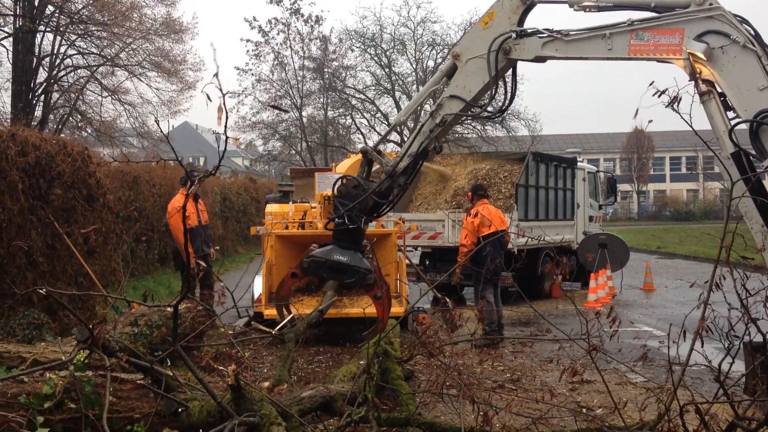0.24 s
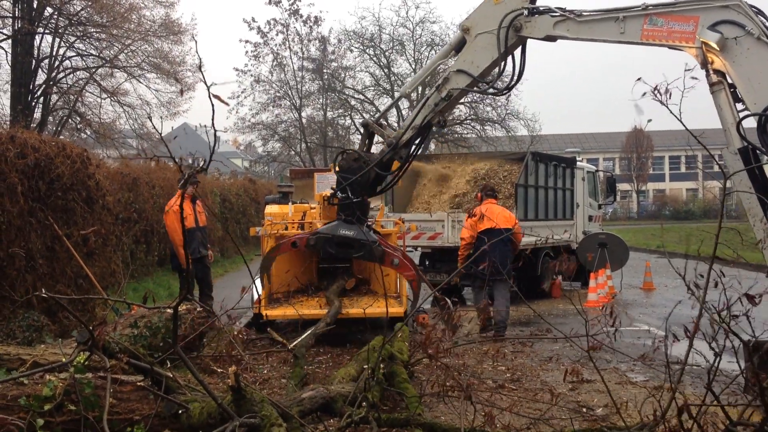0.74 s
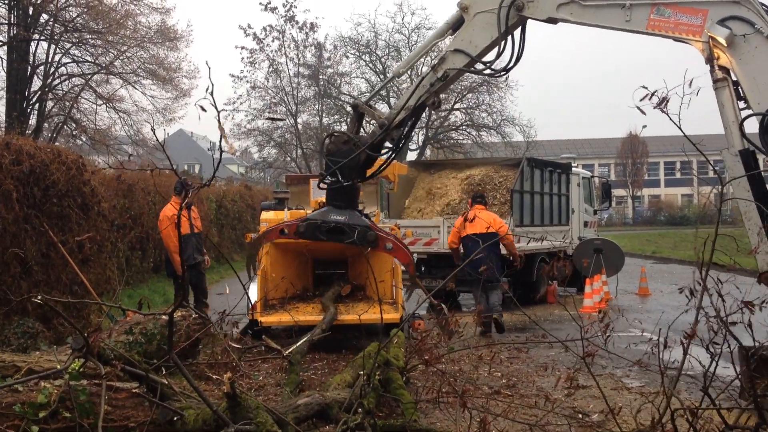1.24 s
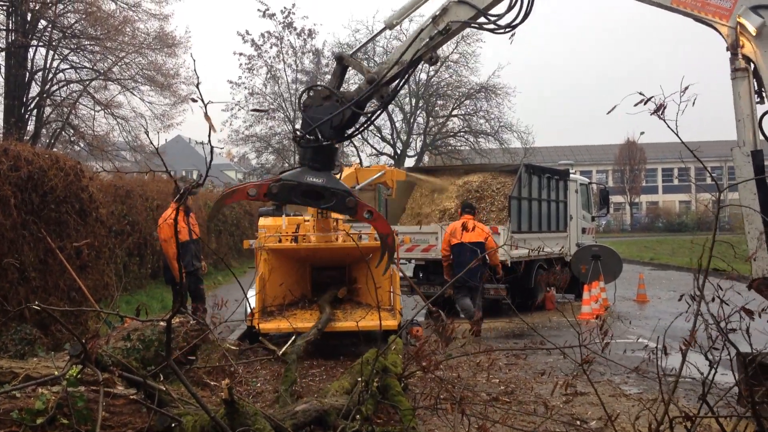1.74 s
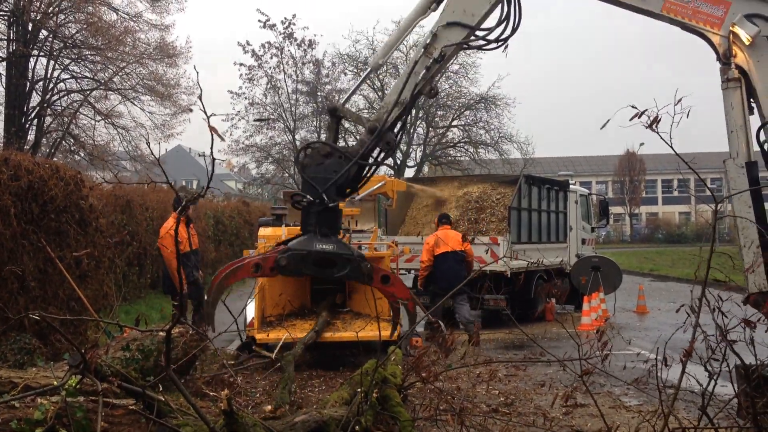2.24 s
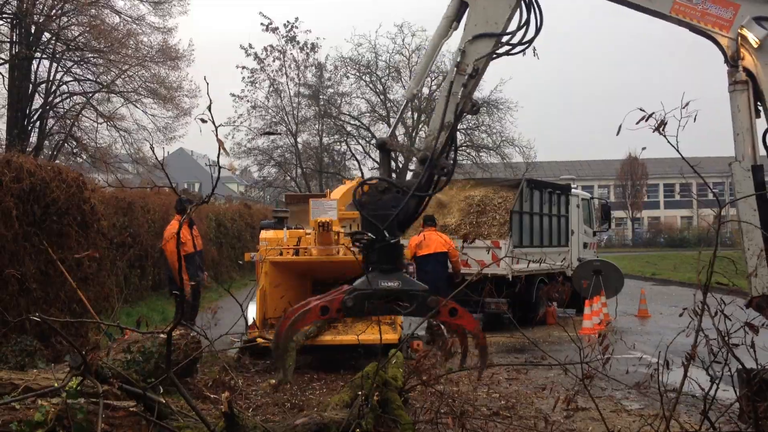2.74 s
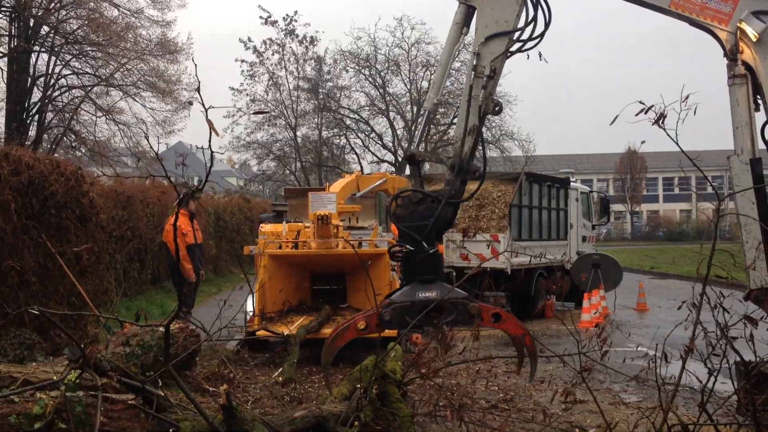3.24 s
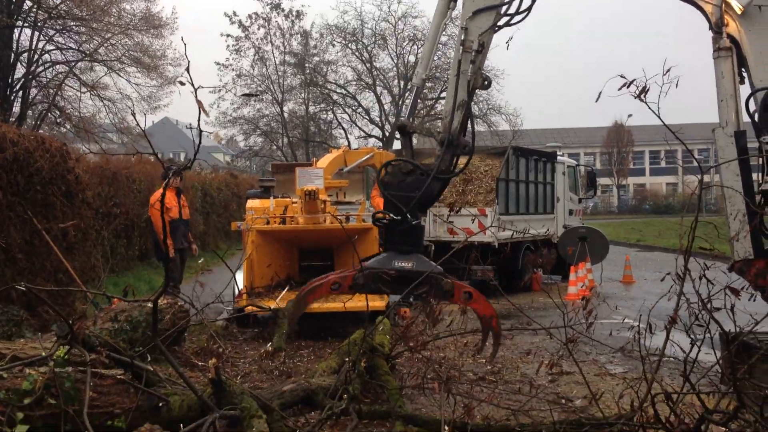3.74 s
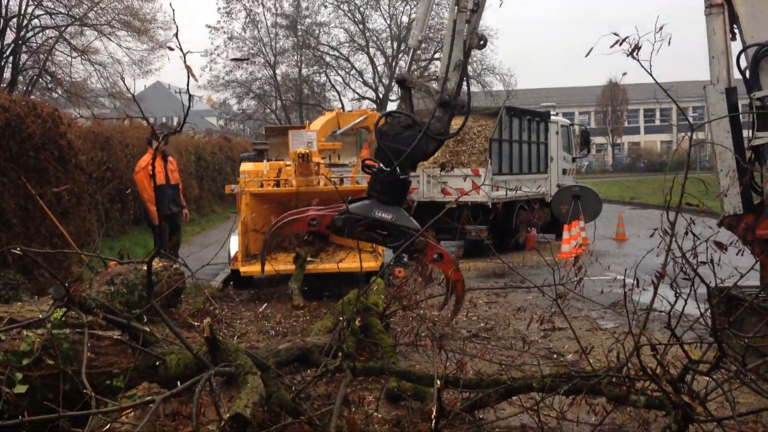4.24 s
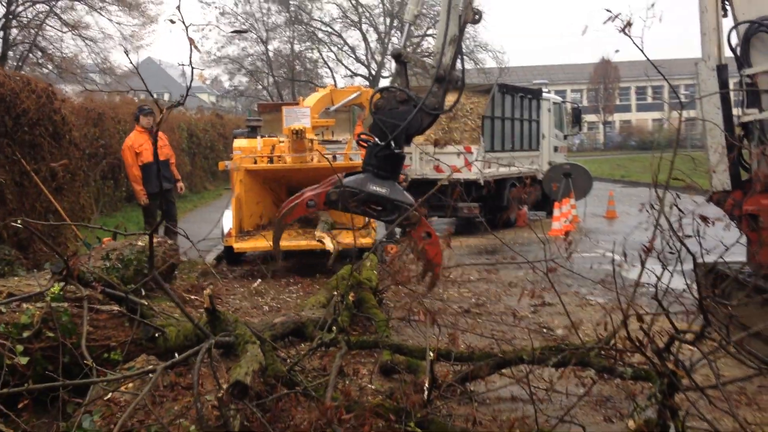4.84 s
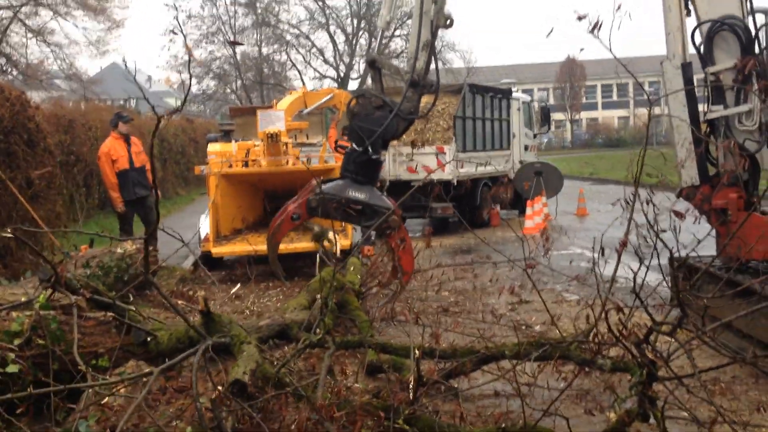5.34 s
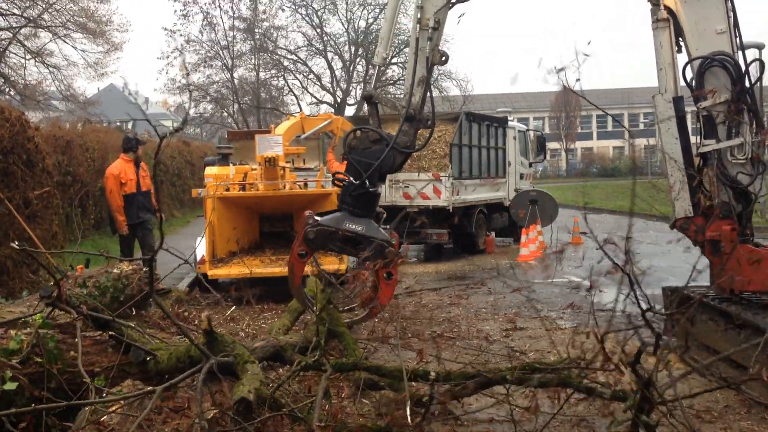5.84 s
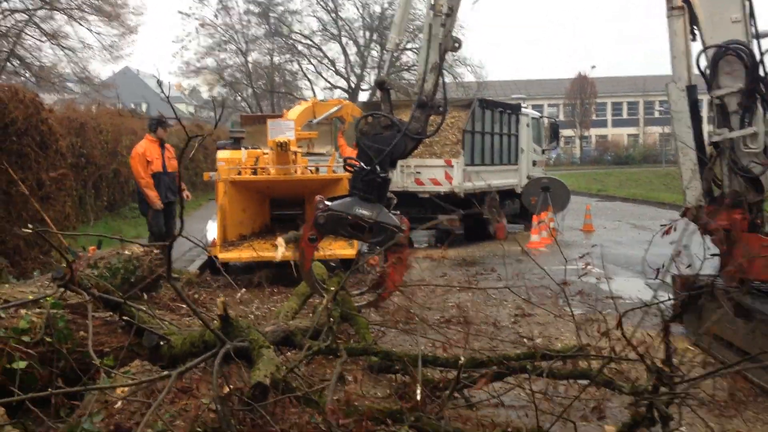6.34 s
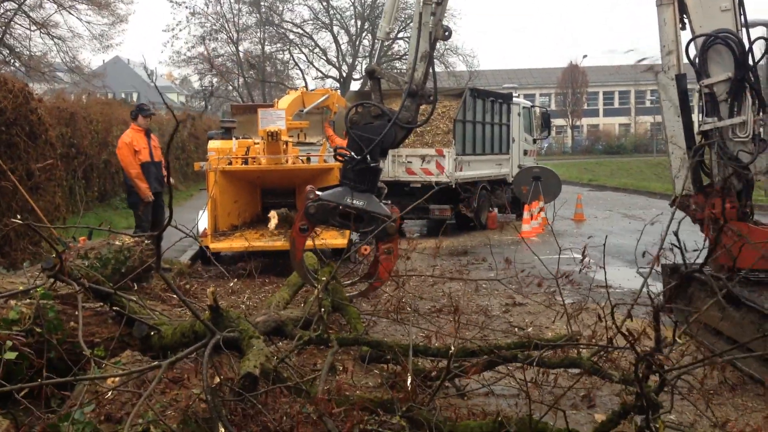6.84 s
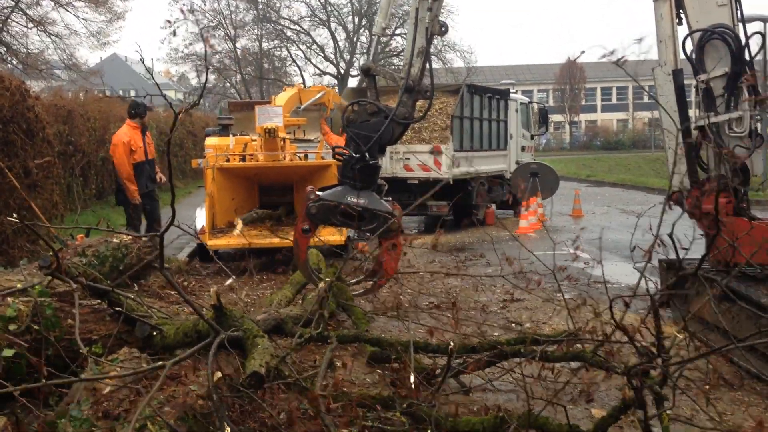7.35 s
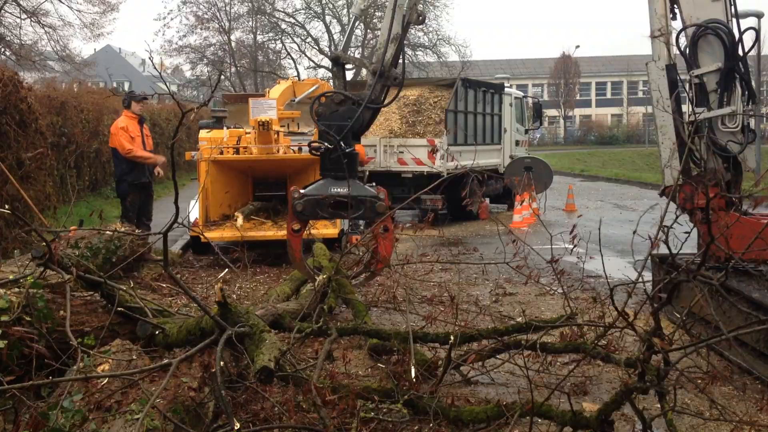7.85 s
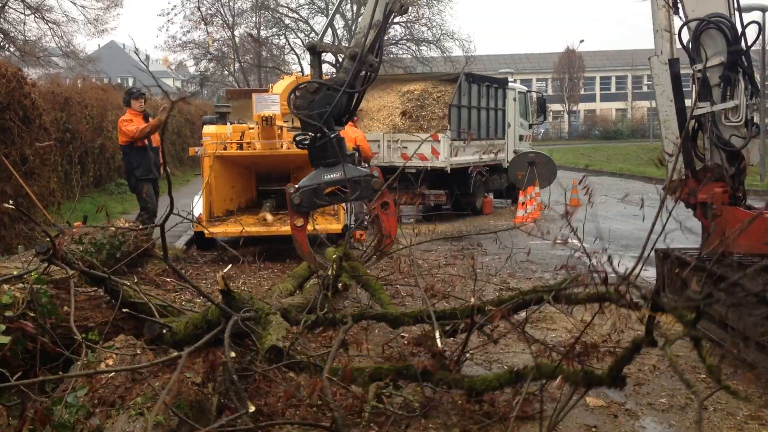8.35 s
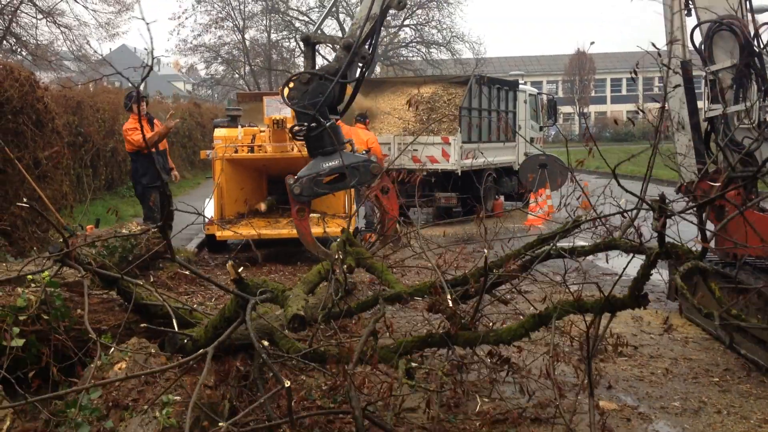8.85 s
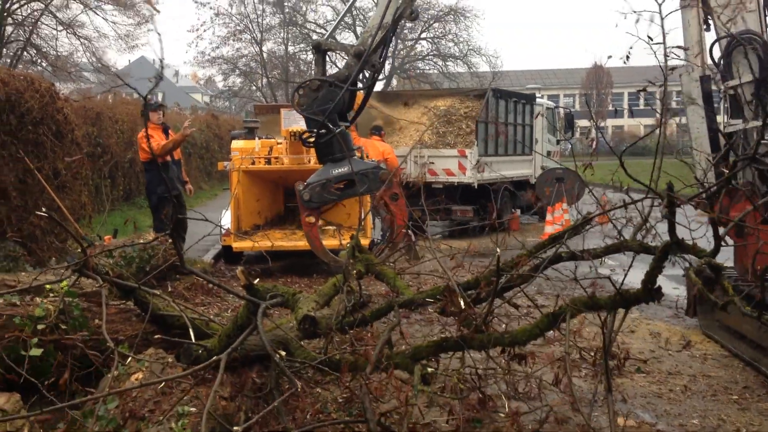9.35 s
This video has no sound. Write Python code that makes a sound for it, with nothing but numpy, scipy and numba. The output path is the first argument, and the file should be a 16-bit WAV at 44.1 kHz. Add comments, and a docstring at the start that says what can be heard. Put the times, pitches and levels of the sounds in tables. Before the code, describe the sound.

Outdoors, a wood chipper's droning drum growls through branches, slows, spins up, stutters with a crack, and settles into lighter steady chopping.

```python
"""At once one hears a brush chipper's hum and the rapid chopping of a log, over a steady roar, outdoors.
The hum is a harmonic series locked to the drum; each knife pass excites resonances, a woody tone and noise.
The drum slows under the load and spins up again while the feed pauses, then nibbles thinner wood at steady speed.
The roar is shaped noise and the yard adds diffuse reverberation. A few metres away a small microphone rounds
the peaks; the sound drops out twice for an instant, and the second return brings a crack."""
import sys
import numpy as np
from scipy import signal
from scipy.fft import rfft, irfft, next_fast_len
from scipy.io import wavfile
from scipy.ndimage import uniform_filter1d
from numba import njit

SR = 44100
rng = np.random.default_rng(int(sys.argv[2]) if len(sys.argv) > 2 else 0)


def int16_out(signal):
    """Quantize to a 16-bit WAV file."""
    q = np.round(np.clip(np.atleast_2d(signal).T, -1, 1) * 32767)
    wavfile.write(sys.argv[1], SR, q.astype(np.int16))


N = 422919
T = np.arange(N) / SR  # time [s]


def undb(db):
    """Level law: amplitude ratio is ten to the power dB / 20."""
    return 10 ** (np.asarray(db) / 20)


def unit(x):
    """Normalisation of effective value: scale to rms 1."""
    return x / np.sqrt(np.mean(x ** 2))


def mix_db(empty_db, fed_db, fed):
    """Energetic addition: blend two levels by power, with fed running from 0 to 1."""
    power = undb(empty_db) ** 2 * (1 - fed) + undb(fed_db) ** 2 * fed
    return 10 * np.log10(power)


def curves(table):
    """Linear interpolation: join every column by straight lines in time."""
    seconds, *columns = np.transpose(table)
    return [np.interp(T, seconds, column) for column in columns]


def bump(at, half):
    """Gaussian envelope: a smooth hump of height 1, down to 1/e at half [s] from its centre."""
    return np.exp(-((T - at) / half) ** 2)


def walk(rate):
    """Slow random modulation: values held 1 / rate [s] and smoothed twice, with a spread near 1."""
    hold = int(SR / rate)
    steps = np.repeat(rng.standard_normal(N // hold + 1), hold)
    smooth = uniform_filter1d(uniform_filter1d(steps, hold), hold)
    return 1.25 * smooth[:N]


@njit
def svf(x, hz, width):
    """Resonance: a state-variable band-pass with a moving centre and gain 1 there."""
    y, band, low = np.empty(len(x)), 0., 0.
    for i in range(len(x)):
        g, damping = np.tan(np.pi * hz[i] / SR), width / hz[i]
        v = (band + g * (x[i] - low)) / (1 + g * (g + damping))
        band, low, y[i] = 2 * v - band, low + 2 * g * v, damping * v
    return y


def ring(x, modes, drift_db):
    """Modal superposition: steep resonances of alternating sign, each slowly swelling and fading."""
    out = 0
    for k, (hz, width, db) in enumerate(modes):
        centre = np.full(N, 1. * hz)
        # two band-passes in series steepen the skirts
        mode = svf(svf(x, centre, 1. * width), centre, 2. * width)
        out = out + (-1) ** k * undb(db + drift_db * walk(9)) * mode
    return unit(out)


def coloured(spectrum):
    """Spectral shaping: white noise filtered to a (frequency, level) curve, rms 1."""
    hz, db = np.transpose(spectrum)
    size = next_fast_len(N)
    f = np.maximum(np.arange(size // 2 + 1) * SR / size, 1)
    gain = undb(np.interp(np.log(f), np.log(hz), db))
    return unit(irfft(rfft(rng.standard_normal(size)) * gain, size)[:N])


# Drum speed, slower under load: (time [s], knife rate [Hz])
DRUM_SPEED = [(0.0, 44.85), (0.45, 41.31), (0.63, 41.29), (1.26, 47.96), (1.49, 49.83), (1.64, 49.43),
              (2.02, 45.39), (2.46, 44.28), (2.84, 40.88), (3.0, 41.35), (3.45, 46.52), (3.73, 48.77),
              (3.88, 48.93), (4.16, 46.49), (4.68, 48.2), (5.68, 48.7), (6.78, 49.21), (7.89, 48.6),
              (8.49, 49.03), (9.23, 49.18), (9.59, 48.94)]
FIRST_TURN = .66  # part of a turn done at the start


def drum_turns():
    """Phase is the integral of frequency: knife rate summed into turns of the drum."""
    return np.cumsum(curves(DRUM_SPEED)[0]) / SR + FIRST_TURN


# Harmonics of the hum before momentary swells:
# (multiple of knife rate [1], drum empty [dB], cutting log [dB], cutting thin wood [dB], wander [dB])
HUM_HARMONICS = [(2, -53.5, -48, -39.5, 1.3), (3, -42, -39, -34, 3), (4, -32.5, -22.5, -23, 1.8),
                 (5, -40.5, -24, -31, 2.5), (6, -26.5, -28, -26, 2.13), (7, -40, -37, -36, 2.5),
                 (8, -41.5, -28.5, -36.5, 0.94), (9, -55, -46.5, -49, 2.1), (10, -51.5, -41, -48.5, 2.5),
                 (11, -62.5, -52, -54, 1)]
# Single harmonics that swell or dip for a moment: (time [s], multiple [1], change [dB], half length [s])
HARMONIC_SWELLS = [(.2, 4, 6, .2), (0.259, 7, 21, .1), (0.298, 3, 8, 0.14), (.3, 5, 5, 0.12),
                   (0.534, 5, 9.5, 0.066), (0.553, 4, -12.5, 0.065), (0.854, 4, 8, 0.1),
                   (1.097, 6, 2.5, 0.28), (0.657, 4, -5, .05), (1.22, 4, -7, 0.056), (1.45, 8, 5.5, 0.17),
                   (1.203, 10, 4, .15), (1.43, 4, 8, 0.063), (.11, 6, 7, .06), (2.098, 6, 5, .08),
                   (2.625, 6, 4, 0.055), (2.857, 6, -7, .06), (3.3, 6, -5, .06), (3.523, 6, -3, 0.054),
                   (3.75, 8, 5.5, .1), (4.73, 7, 6, 0.091), (5.39, 7, 4.5, .06), (6.2, 8, 2, 0.18),
                   (7.202, 4, 2.5, 0.13), (7.88, 6, -6, 0.06), (8.4, 4, 2, 0.14), (1.654, 4, 8.5, 0.047),
                   (1.702, 5, 7.5, 0.11), (1.717, 2, 20, 0.21), (1.703, 3, 16.5, 0.14), (1.75, 6, -5, .15),
                   (1.87, 4, -6, 0.053), (2.204, 4, 9.5, 0.27), (2.2, 5, -15, 0.074), (2.413, 3, 14, 0.087),
                   (2.42, 2, 11, .07), (2.536, 7, 10.5, 0.052), (2.6, 8, -18, 0.11), (2.747, 7, 11, 0.053),
                   (2.86, 2, 12.5, .07), (3.254, 4, 7.5, 0.1), (3.628, 4, -12, 0.087), (3.947, 5, 8, 0.084),
                   (3.954, 6, 10, 0.087), (3.965, 2, 19, 0.087), (4.255, 5, 8, .1), (4.252, 6, 7, 0.062),
                   (4.24, 2, 16, .1), (4.25, 8, -18, 0.25), (4.302, 7, -16.5, 0.29), (4.613, 2, 7.5, 0.045),
                   (5.273, 5, 12.5, 0.2), (5.35, 4, 3, .2), (6.199, 4, -3.5, 0.36), (7.592, 5, 6, 0.08),
                   (8.05, 5, 5.5, 0.096), (8.557, 5, 7.5, 0.087), (8.9, 5, 7, .07), (8.907, 4, 5.5, 0.067)]
# The log gives way to thin wood: (start [s], end [s])
THINNING = 4.3, 4.7


def hum(turns, fed):
    """Harmonic series: engine and drum share one speed; the wood sets the balance and each partial wanders."""
    out, thin = 0, np.interp(T, THINNING, (0, 1))
    for k, empty_db, log_db, thin_db, wander_db in HUM_HARMONICS:
        cutting_db = log_db + thin * (thin_db - log_db)
        db = mix_db(empty_db, cutting_db, fed) + wander_db * walk(7)
        db = db + sum(change * bump(s, half) for s, which, change, half in HARMONIC_SWELLS if which == k)
        level = np.sqrt(2) * undb(db + .8 * walk(15))  # a sine peaks at root 2 times its rms
        # fixed phase offsets, plus a slight phase wander
        phase = 2 * np.pi * k * turns + .7 * k * k + .12 * walk(10)
        out = out + level * np.sin(phase)
    return out


# Spells in which the roller pushes wood in: (start [s], end [s], moment a roller tooth grips [s])
FEED_SPELLS = [(-.1, .55, 0.12), (1.546, 2.88, 1.71), (3.83, 9.7, 7.6)]
BITE_S, CLEAR_S = 0.042, 0.08  # the cut starts quickly; the last chips clear more slowly
TOOTH_HZ = 7.44  # roller teeth a second
# Half the peak-to-trough swing at the roller teeth: (thud [dB], knock [dB], overtone [dB], rasp [dB], spray [dB])
TOOTH_SWELL = (1.3, 1.1, 1.1, 1.3, 1.4)
# No wood in the drum: (thud [dB], knock [dB], overtone [dB], rasp [dB], spray [dB])
EMPTY_LEVELS = (-33, -67.5, -70.5, -56, -77)
# The wood being cut, before knots and tooth swells:
# (time [s], thud [dB], knock [dB], knock pitch [Hz], overtone [dB], rasp [dB], spray [dB])
WOOD_CUT = [(0, -21.5, -36, 880, -53.5, -36.5, -60), (.16, -23, -45, 910, -53.5, -41.5, -60),
            (.3, -18.5, -34.5, 1000, -58, -36.5, -58.5), (.55, -21.5, -49, 967, -56.5, -39, -60.5),
            (1.58, -25, -43, 994, -54, -37, -59), (1.7, -17.5, -47.5, 984, -44.5, -35, -51.5),
            (1.87, -22, -36.5, 1035, -52, -39.5, -60.5), (2.2, -20, -37, 1056, -48, -35, -55),
            (2.42, -20.5, -37.5, 1000, -55, -36.5, -58.5), (2.6, -24.5, -40.5, 1040, -57, -41.5, -61.5),
            (2.7, -16.5, -32.5, 1076, -52, -37, -58), (2.88, -19.5, -38.5, 1110, -58.5, -37.5, -64),
            (3.85, -21, -34, 893, -39.5, -34.5, -64), (4.0, -22.5, -35, 1050, -47.5, -34, -58.5),
            (4.09, -25.5, -40, 1093, -43.5, -38, -66), (4.2, -21, -40, 968, -49.5, -39, -62.5),
            (4.37, -24, -45.5, 1000, -53, -39.5, -64), (4.7, -29, -46, 1020, -58.5, -44, -66.5),
            (5.25, -26, -45, 1040, -48.5, -41, -65), (5.6, -28.5, -52.5, 956, -57, -44.5, -65.5),
            (6.05, -30, -45, 993, -59.5, -45.5, -68), (6.3, -29.5, -42.5, 1125, -49, -43, -64.5),
            (6.55, -31.5, -46.5, 938, -50, -45, -67), (6.85, -32, -45, 1085, -51.5, -45.5, -66.5),
            (7.1, -28, -50, 1013, -53.5, -45, -66.5), (7.4, -30.5, -46, 975, -50.5, -42.5, -66.5),
            (7.75, -31, -39, 1140, -44.5, -42.5, -67), (8.05, -27.5, -50.5, 1055, -54, -46, -67.5),
            (8.4, -29, -56.5, 1056, -49, -42.5, -64.5), (8.65, -30, -51, 990, -57, -47, -68),
            (8.95, -27, -47.5, 980, -55, -39.5, -62.5), (9.1, -30, -50.5, 1000, -57.5, -41.5, -64.5),
            (9.35, -27, -53.5, 1117, -45.5, -40.5, -66), (9.59, -32.5, -52, 1150, -58, -47.5, -68.5)]
# Knots that hit louder, or slips that go soft: (time [s], change of thud [dB], change of knock and overtone [dB])
KNOT_HITS = [(.06, -0.5, 7.5), (.2, -5.5, -2), (.27, 3.5, -3), (.48, 2.5, 1.5), (1.65, 4, -1),
             (1.79, -2.5, 6), (1.9, 0, 6.5), (2.04, -1.5, 4.5), (2.32, 2, 5.5), (2.46, -2, 6),
             (2.55, -1, 3.5), (2.7, 2, 5), (2.8, 2.5, -0.5), (3.901, 8, 2), (3.95, -5, 1), (4.001, 12.5, 8),
             (4.16, 6.5, 11.5), (4.3, 1.5, 3), (4.43, 2, 7), (4.54, 5.5, 6), (5.129, 4.5, 5), (4.73, 5, 0),
             (4.83, 1, 2.5), (4.95, 1, 3.5), (5.9, -0.5, 7.5), (6.17, -0.5, 6), (6.3, 3.5, 4),
             (6.75, 0.5, 8), (6.86, 2, 4), (7.13, 4, 5.5), (7.269, -1.5, 7.5), (7.56, 2, 3),
             (7.68, -1, 3.5), (7.779, -1.5, 4.5), (7.9, -0.5, 3.5), (8.2, 2, 5), (8.33, 4, 2),
             (8.71, 5.5, -2), (8.77, -2, 4), (8.97, 7, 1), (9.08, -15, -18), (9.16, 7.5, 3), (9.21, -4, -9),
             (9.27, 1, 6.5), (9.38, 8, 7.5), (9.52, 2, 3.5)]
KNOT_S, KNOT_RASP = .025, .4  # half length [s]; share of the knock's change in rasp and spray


def feed():
    """Load modulation: roller and knots set five cutting levels, knock pitch and how full the drum is (0-1)."""
    fed, grip = 0, 0
    for start, end, tooth in FEED_SPELLS:
        bite = np.clip((T - start) / BITE_S, 0, 1) ** 2
        on = bite * np.exp(-np.maximum(T - end, 0) / (CLEAR_S / 2))
        fed = fed + on
        grip = grip + on * np.cos(2 * np.pi * TOOTH_HZ * (T - tooth))
    fed = np.minimum(fed, 1)
    low = sum(thud_change * bump(s, KNOT_S) for s, thud_change, _ in KNOT_HITS)
    high = sum(knock_change * bump(s, KNOT_S) for s, _, knock_change in KNOT_HITS)
    thud_db, knock_db, knock_hz, over_db, rasp_db, spray_db = curves(WOOD_CUT)
    wood = (thud_db + low, knock_db + high, over_db + high,
            rasp_db + KNOT_RASP * high, spray_db + KNOT_RASP * high)
    levels = [mix_db(empty, db + swell * grip, fed)
              for db, swell, empty in zip(wood, TOOTH_SWELL, EMPTY_LEVELS)]
    return levels, knock_hz, fed


def blows(turns, scatter_db, jitter_s):
    """Impulsive excitation: one impulse per knife pass, uneven in strength and moment."""
    at = np.flatnonzero(np.diff(np.floor(turns)) > 0)
    delay, strength = rng.standard_normal((len(at), 2)).T
    at = np.clip(at + (jitter_s * SR * delay).astype(int), 0, N - 1)
    x = np.zeros(N)
    x[at] = undb(scatter_db * strength)
    return x


def burst(turns, rise, length, steady, scatter_db):
    """Periodic amplitude modulation: swells as the knife enters, fades to a steady share, new size each turn."""
    size = undb(scatter_db * rng.standard_normal(int(turns[-1]) + 1))[turns.astype(int)]
    part = turns % 1
    return unit(steady + size * (1 - np.exp(-part / rise)) * np.exp(-part / length))


# Resonances of the housing: (frequency [Hz], width [Hz], relative level [dB])
HOUSING_MODES = [(96, 21, -18), (132, 40, -7), (179, 45, -2), (234.6, 49.5, 3.5), (300, 77.4, -3.5),
                 (375, 62.7, -7), (489, 153, -16.5)]


def thud(turns):
    """Forced resonance: each cut, partly a clean blow and partly tearing fibres, excites the housing."""
    blow = 0.52 * unit(blows(turns, 2.4, .0008))
    tearing = rng.standard_normal(N) * burst(turns, 0.27, 1.0, 0.32, 2.2)
    return ring(blow + tearing, HOUSING_MODES, 1.0)


def knock(turns, hz, db, climb, scatter):
    """Transient tone: woody at each knife pass, rising as the chip shortens, and no two chips are alike."""
    turn, part = turns.astype(int), turns % 1
    pitch_chance, phase_chance, size_chance = rng.standard_normal((turn[-1] + 1, 3))[turn].T
    pitch = hz * (1 + scatter * pitch_chance) * (1 + climb * (np.minimum(part, .5) - .2))
    cycles = np.cumsum(pitch) / SR
    cycles -= cycles[np.searchsorted(turn, turn)]  # the tone starts afresh with every cut
    shape = (part / .16) ** 2 * np.exp(-2 * part / .16)  # peaks .16 of a turn after the pass
    tone = np.sin(2 * np.pi * cycles + .25 * phase_chance)
    return undb(db) * unit(undb(1.6 * size_chance) * shape * tone)


# Resonances of the hopper: (frequency [Hz], width [Hz], relative level [dB])
HOPPER_MODES = [(694, 61, -2), (845, 150, 8.5), (1154, 150, 6.5), (1313, 150, 1.5), (1608, 170, -4),
                (1954, 330, -2), (2310, 350, -5), (2517, 380, -6.5)]


def rasp(turns):
    """Resonant filtering: a blow and a noise burst ring the hopper, low-passed at 2750 Hz."""
    blow = .5 * unit(blows(turns - .1, 2.5, .0002))
    tearing = rng.standard_normal(N) * burst(turns - .04, 0.16, .5, 0.22, 1.8)
    low_pass = signal.butter(6, 2750, fs=SR, output="sos")
    return signal.sosfilt(low_pass, ring(blow + tearing, HOPPER_MODES, 1.8))


# Spectrum of the flying chips: (frequency [Hz], relative level per Hz [dB])
CHIP_SPECTRUM = [(1760, -28.5), (3000, 1), (3840, -8), (4250, -3.5), (4840, -8.5), (6850, -7.5),
                 (8130, -9.5), (14000, -10), (15300, -16.5)]
# Peaks in the treble of the chips, as from a reflection near the microphone:
# (frequency [Hz], width [Hz], relative level [dB])
TREBLE_PEAKS = [(3420, 220, -8.5), (4280, 180, -10), (5170, 270, -13), (5900, 250, -13), (6350, 240, -17),
                (7130, 450, -10.5), (7560, 150, -16), (8300, 330, -13.5), (10740, 500, -15)]


def spray(turns):
    """Modulated broadband noise: flying chips, coloured by narrow treble peaks."""
    chips = coloured(CHIP_SPECTRUM) + .4 * ring(rng.standard_normal(N), TREBLE_PEAKS, 2.8)
    flicker = undb(1.0 * walk(60))
    return chips * burst(turns - .04, .04, 0.42, 0.49, 1.5) * flicker


def knives(turns, levels, knock_hz):
    """Superposition: each cut thuds in the housing, knocks on the wood, rasps in the hopper and sprays chips."""
    thud_db, knock_db, over_db, rasp_db, spray_db = levels
    wood = knock(turns, knock_hz, knock_db, 0.52, 0.017)
    overtone_hz = 1450 + 90 * walk(5.2)
    wood += knock(turns, overtone_hz, over_db, 0.32, 0.022)
    return undb(thud_db) * thud(turns) + wood + undb(rasp_db) * rasp(turns) + undb(spray_db) * spray(turns)


def yard(cuts):
    """Diffuse reverberation: convolution with noise that decays 60 dB in 0.45 s, after a 20 ms delay."""
    t = T[:SR // 2]
    tail = rng.standard_normal(SR // 2) * np.exp(-np.log(1000) * t / 0.45) * (t > .02)
    tail /= np.sqrt(np.sum(tail ** 2))
    return undb(-9) * signal.fftconvolve(cuts, tail)[:N]


# Spectrum of fan and engine: (frequency [Hz], relative level per Hz [dB])
ROAR_SPECTRUM = [(7.1, -82.5), (12, -50), (43, -35.5), (177, -0.5), (232, -9), (278, -1), (323, -22.5),
                 (375, -17.5), (423, -17.5), (624, -38), (1100, -35), (1630, -49), (2330, -45.5),
                 (3760, -63), (15300, -76)]
ROAR_DB = -33  # mean level, about which it wanders


def roar():
    """Stationary broadband noise: fan and engine as shaped noise whose level wanders slightly."""
    return undb(ROAR_DB + 0.56 * walk(4.3)) * coloured(ROAR_SPECTRUM)


# From this moment the knife sounds run ahead of the hum: (time [s], advance [turns])
KNIFE_ADVANCE = (3.4, .29)


def scene():
    """Linear superposition: hum, cuts, their short echo from the yard, and roar add at the listener."""
    turns = drum_turns()
    levels, knock_hz, fed = feed()
    advance_s, advance = KNIFE_ADVANCE
    cuts = knives(turns + advance * (T > advance_s), levels, knock_hz)
    return (hum(turns, fed) + cuts + yard(cuts) + roar())[None]


# Gaps in the sound: (start [s], end [s], level left once the trace has died [dB])
GAPS = [(3.9575, 3.9808, -24), (4.0038, 4.0456, -56)]
# The crack as the sound returns, before smoothing: (time [s], peak level [dB], length of its flat part [s])
RETURN_CRACK = (4.0456, -10.5, .0007)
TOP_HZ = 15300  # upper band limit


def record(dry):
    """Saturation, gating and band limiting: peaks are rounded, gaps cut the sound, and the top is removed."""
    gain = np.ones(N)
    for start, end, db in GAPS:
        gap = (T >= start) & (T < end)
        # a faint trace lingers for a few ms after the sound is cut
        trace = undb(-22) * np.exp(-(T[gap] - start) / .003)
        gain[gap] = undb(db) + trace
    gain *= np.minimum((T[-1] - T) / .004, 1)  # the end fades out quickly
    crack_s, crack_db, length = RETURN_CRACK
    after, since = T >= crack_s, np.maximum(T - crack_s, 0)
    # the level creeps back over some ms after the second gap
    gain *= 1 - .7 * after * np.exp(-since / .006)
    crack = -undb(crack_db) * after * (.65 * (since < length) + .35 * np.exp(-since / .002))
    rounded = np.tanh(dry / .9) * .9  # the microphone rounds the loudest peaks
    x = rounded * uniform_filter1d(gain, size=11) + uniform_filter1d(crack, size=3)
    return signal.sosfilt(signal.ellip(10, .2, 80, TOP_HZ, fs=SR, output="sos"), x)


dry = scene()
out = record(dry)
int16_out(out)
```